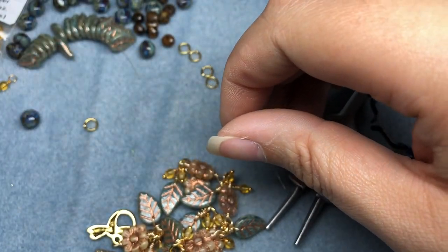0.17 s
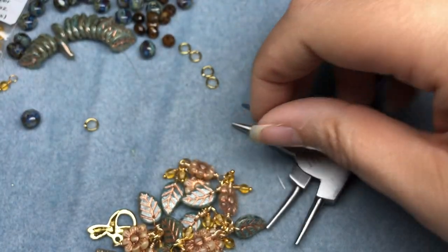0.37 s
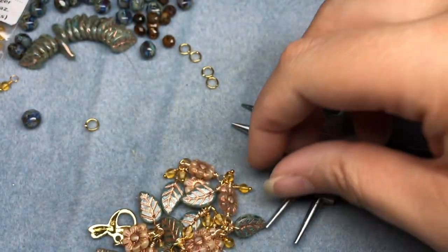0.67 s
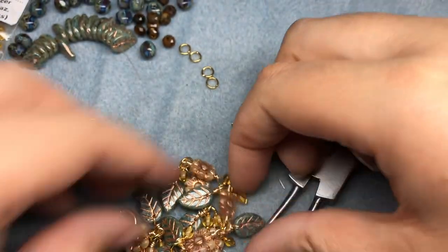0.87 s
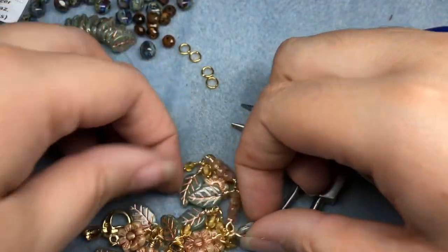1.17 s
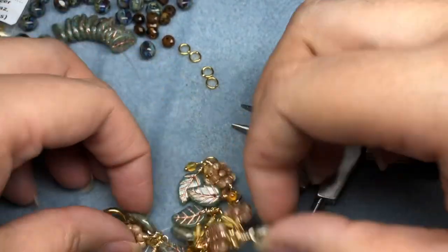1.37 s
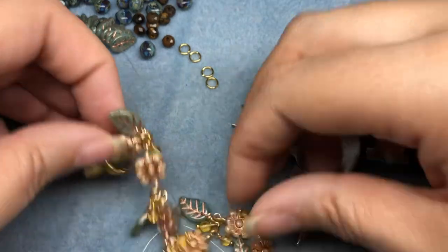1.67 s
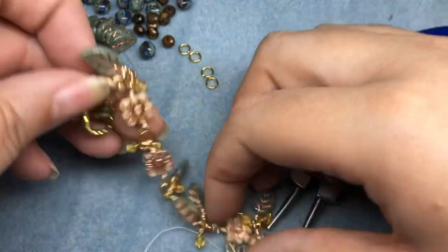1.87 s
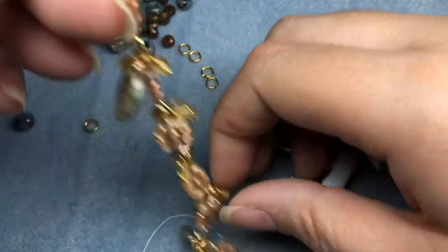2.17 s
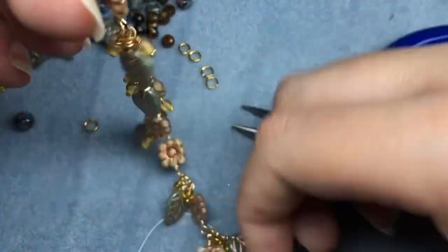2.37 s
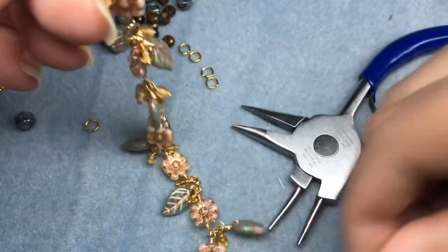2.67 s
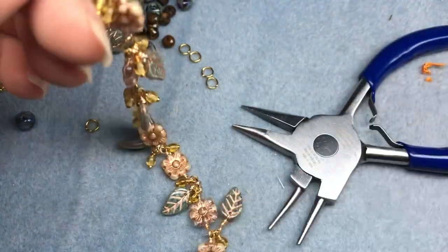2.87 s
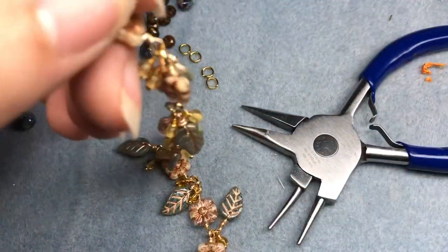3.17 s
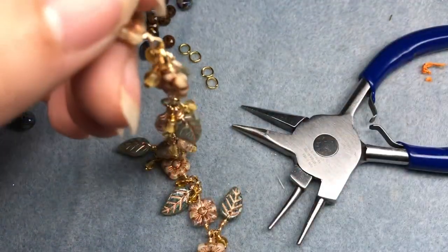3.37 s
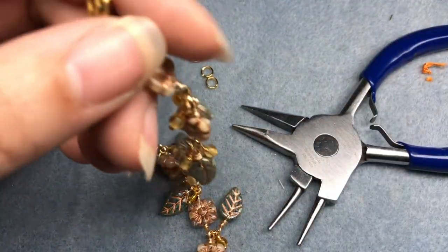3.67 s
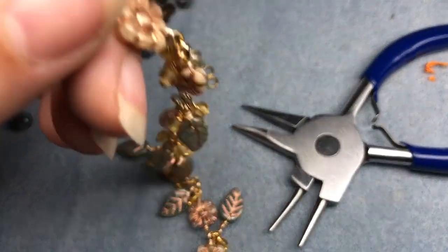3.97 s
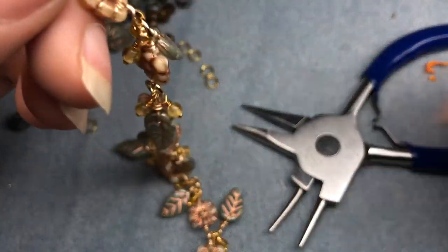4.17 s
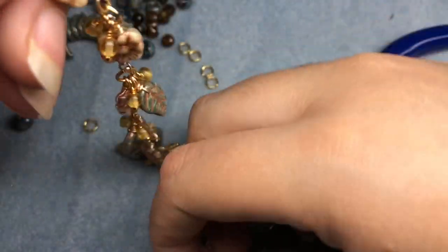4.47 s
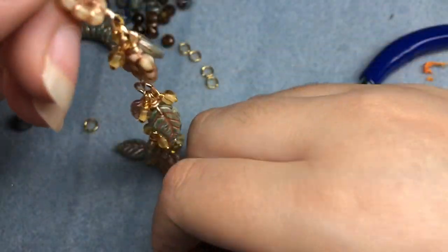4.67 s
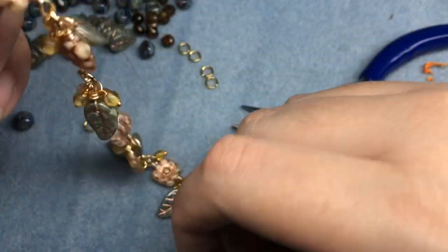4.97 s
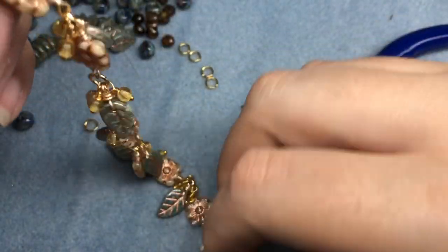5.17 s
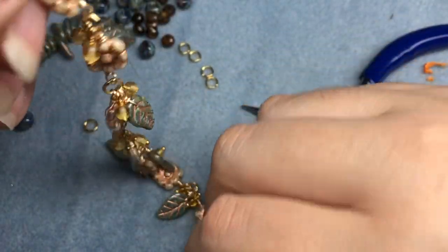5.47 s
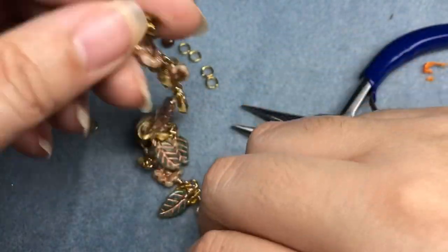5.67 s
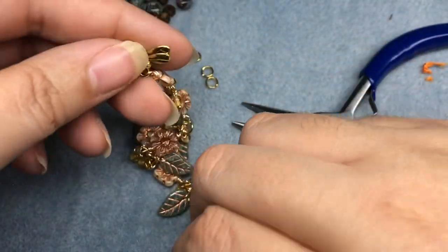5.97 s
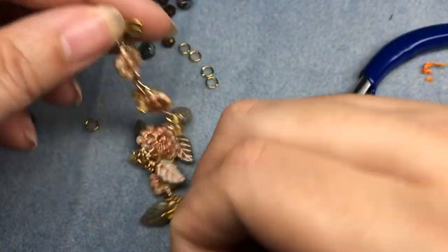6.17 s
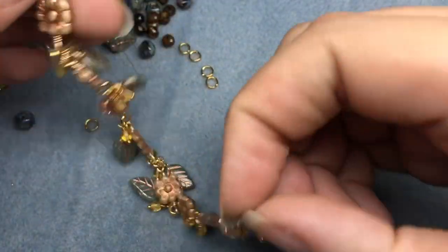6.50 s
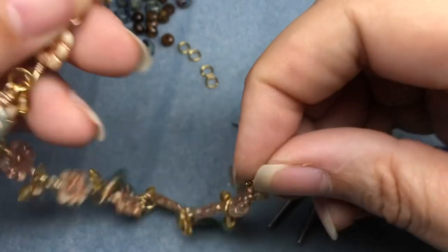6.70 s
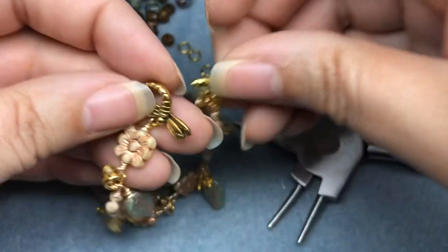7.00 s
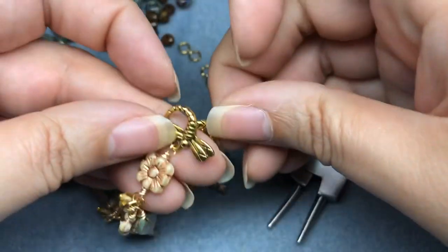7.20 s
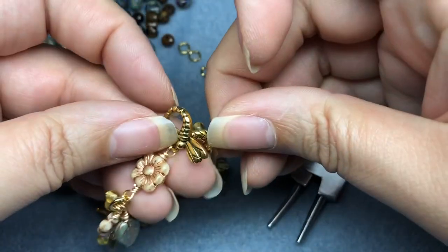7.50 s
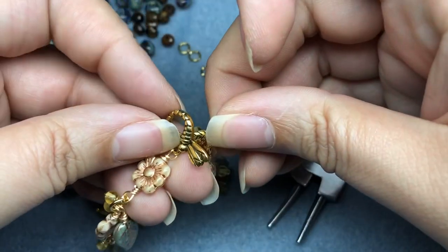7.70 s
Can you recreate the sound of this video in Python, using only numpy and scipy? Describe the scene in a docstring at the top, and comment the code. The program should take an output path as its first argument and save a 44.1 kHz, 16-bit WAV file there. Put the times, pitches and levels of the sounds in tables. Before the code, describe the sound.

After two knocks of pliers pushed aside, a beaded bracelet ticks and rattles lightly, close by in a quiet room.

```python
"""Handling a bead bracelet

In a quiet room, pliers are pushed aside: they scrape and knock twice, making a wooden table ring.
Then a bracelet is lifted and turned over a cloth mat, close to the microphone. Its glass beads, metal
leaves and rings tick against each other, and countless tiny contacts blur into a rustle.
Behind it are a faint hiss, a ventilation hum and slow sways of air pressure on the microphone."""
import sys
import numpy as np
from scipy import signal
from scipy.fft import rfft, irfft, next_fast_len
from scipy.io import wavfile
from scipy.ndimage import map_coordinates

SR = 44100
rng = np.random.default_rng(int(sys.argv[2]) if len(sys.argv) > 2 else 0)


def int16_out(signal):
    """Quantize to a 16-bit WAV file."""
    q = np.round(np.clip(np.atleast_2d(signal).T, -1, 1) * 32767)
    wavfile.write(sys.argv[1], SR, q.astype(np.int16))


N = 345744

# A fade time (fade_s) is how long a sound takes to drop by 60 dB.
# Tone of the background noise: pitch_hz, level_db
HISS_TONE = [(15, -58.5), (45, 5.5), (75, 3), (120, 1.5), (190, -6.5), (330, -12), (430, -16.5), (475, -13),
             (530, -18.5), (1300, -21), (2500, -26.5), (5000, -33), (10000, -40), (16000, -45.5)]
# Loudness of the background noise, which swells briefly around the pliers' knocks: time_s, level_db
HISS_LEVELS = [(0.0, -53), (0.45, -44.5), (0.72, -54), (4.2, -53.5), (4.45, -54.5), (7.84, -55)]
# Faint, unsteady hums of the ventilation: pitch_hz, width_hz, level_db
HUMS = [(406, 12, -80.5), (466, 14, -80), (1270, 25, -84)]
# Tone of the slow pressure sway: pitch_hz, level_db
SWAY_TONE = [(1, -20.5), (4, 2.5), (12, -4.5), (22, -14.5), (40, -45.5), (200, -140)]
# Tone of the deep rumble: pitch_hz, level_db
RUMBLE_TONE = [(5, -59.5), (12, -24), (22, 5.5), (35, -16), (55, -32), (200, -120)]
# Strength of the sway and the rumble: time_s, sway_db, rumble_db
PRESSURE_LEVELS = [(0.0, -35, -20), (0.17, -34, -56), (0.57, -31.5, -33), (1.07, -41.5, -41),
                   (1.75, -35, -45), (3.38, -38, -46), (3.67, -28.5, -40.5), (3.86, -33.5, -49.5),
                   (4.87, -34, -43), (5.46, -34, -44.5), (5.57, -41, -38), (6.03, -38, -47),
                   (6.09, -28, -44), (7.27, -40.5, -50), (7.49, -29, -34), (7.84, -48, -45)]
# Loudness of the sliding pliers: time_s, level_db
SCRAPE_LEVELS = [(0.06, -100), (0.12, -75), (0.23, -69.5), (0.24, -87), (0.39, -92), (0.41, -58),
                 (0.425, -49), (0.438, -46), (0.44, -95)]
# Pitches that stand out in the scrape: pitch_hz, width_hz, gain_db
SCRAPE_PEAKS = [(900, 1000, 3.5), (1750, 330, 4), (2737, 230, 6.5)]
# The clearest bead and leaf contacts: start_s, level_db, brightness_db_per_octave, middle_boost_db
CLEAR_TICKS = [(0.1681, -60.0, 2, 3.5), (0.8401, -65, -0.5, -3.5), (0.9493, -58.5, -4, -3.5),
               (1.0501, -55.5, -2.3, 8), (1.1743, -55.5, 1.0, 10.0), (1.2342, -55.5, 0.5, 0.0),
               (1.2437, -57, 5, 3), (1.2951, -58.5, -11, 4), (1.3305, -55.0, 2, -2.5),
               (1.338, -58, -1.5, 4.5), (1.3604, -57, 6, -0.5), (1.4298, -66, 0, 0.0),
               (1.4437, -43.5, 1.7, -5), (1.4662, -56, -4.5, 2.5), (1.4771, -62, 3, 2),
               (1.4891, -53, -2.5, 0.0), (1.5141, -50.5, 0, 1.0), (1.548, -52, 0.7, 11),
               (1.5694, -49.5, 8, 3), (1.6073, -48, -2, 11), (1.6577, -61.5, 4, 4),
               (1.7006, -61.5, -1, -5.5), (1.7635, -67.5, -3, 3), (1.8139, -57, -1.1, -4),
               (1.8927, -54.5, -0.4, 7.0), (1.9176, -58, 2, -4.5), (1.9261, -50, -11, 12.0),
               (1.9421, -46.5, 0.9, 4.5), (1.9551, -57.0, -1, 4.0), (1.971, -52, 3, 6),
               (1.98, -43, 1, 21.5), (1.9865, -47.5, 1, 9.5), (2.0553, -62, 4.0, 1),
               (2.0708, -58.5, 7.5, -4.5), (2.1197, -59.5, 4, 2.0), (2.1481, -45.5, 5.5, 3.5),
               (2.219, -54, 9, 3.5), (2.2748, -64, 0.7, 2.5), (2.3212, -62.5, 0.9, -1.0),
               (2.3332, -56, 3, 7), (2.3881, -69, -2.5, 3), (2.4434, -63, -9, 3), (2.5667, -67, 2, 1.5),
               (2.6744, -45, -3.5, 10), (2.6964, -64.5, 3, -1), (2.7787, -66.5, -8.5, 9.5),
               (2.9009, -55.5, 3.7, -3.5), (2.9673, -73, 0.5, -6), (3.6238, -67.5, -10.1, 8.5),
               (3.733, -55, -6, 5.0), (3.75, -55, -13, 6.0), (3.8273, -64.5, -6, 4), (3.981, -61.5, -7, 5),
               (3.9999, -69, 2, -3), (4.0857, -65, -1, -3), (4.4464, -65.5, -2.5, 3), (4.6544, -59, 0, 4.5),
               (4.6719, -61.0, 7, 11), (4.6814, -62, 1, 7), (4.7552, -61.5, 0.0, 10.0),
               (4.7687, -52.0, -1, 3), (4.7886, -63, 0, 13.5), (4.8405, -64.5, -6.5, 6.5),
               (4.856, -64.5, -2.5, 0.0), (4.9383, -53.5, 3.5, 2.5), (4.9787, -60.0, 3.3, -5.5),
               (5.0106, -64.5, -2.5, 1), (5.0595, -66, 0.1, -7.0), (5.1663, -70.5, 2.8, -2.5),
               (5.3109, -61.5, 1.5, 4.5), (5.494, -66, -3.5, -0.5), (5.5314, -57.5, -0.5, 10.5),
               (5.5728, -63, -0.0, 1.5), (5.6093, -55.0, 1.0, -2), (5.6222, -59.5, 6.5, 0.5),
               (5.6397, -59, 8.5, -4), (5.6666, -51.0, 5.2, -7.5), (5.6756, -63, 7.5, 2.0),
               (5.702, -54.5, 0, -5.5), (5.7514, -61.0, -1, 0.5), (5.9016, -63, -8, 8.0),
               (5.9754, -63.5, -7.5, 7.0), (6.0238, -62.5, -0.8, 2.5), (6.0966, -61, -7.5, -5),
               (6.161, -62, 0.7, -5), (6.1695, -62.0, -5.0, 2), (6.2079, -61.5, 0, 2.0),
               (6.2418, -61, 0, -4), (6.2508, -60.5, -4, 6.5), (6.2722, -56.0, 5.1, -5),
               (6.2807, -62, 5, 0.0), (6.3057, -49, 3, 8), (6.3326, -64, 3.5, -4), (6.3635, -57, 4, 3.5),
               (6.4109, -64, 2.0, 0.0), (6.4468, -64.5, 1.6, 6), (6.4548, -65, 2.8, 4),
               (6.4917, -50.5, 4, 0), (6.5182, -59.5, -2.3, -1), (6.5262, -59.0, 7.5, -3),
               (6.5337, -65, 6, 6), (6.5511, -67, 4.5, 0), (6.6289, -56, 8.2, -4.5),
               (6.6394, -55.0, 9.5, -1.5), (6.6519, -59.0, 1, 4.0), (6.6678, -57.5, 3.2, -4),
               (6.6858, -58, -1, -3.5), (6.7312, -64.5, 3, -9), (6.7661, -55.5, 3, -3.5),
               (6.7906, -51, 9.5, 5.0), (6.7995, -59.0, 2.5, -5), (6.8305, -62.5, 4, 4),
               (6.9113, -59.5, 2, -4.5), (6.9322, -49, 2.0, -5.0), (6.9392, -54, 3.5, -6),
               (6.9567, -63.0, 6, -1), (6.9702, -62.5, 4, 1.5), (7.0395, -55.5, -3.5, -1.5),
               (7.047, -60.5, 0, -2.5), (7.1692, -62, 6.5, 1.0), (7.2081, -60, 3, 0.5),
               (7.2186, -66, 3.7, 0), (7.3054, -65.5, 5, 6), (7.5289, -70, 1, -4.5),
               (7.7678, -64.0, 2.2, 2)]
# The dull, middle and bright bands of a tick: low_hz, high_hz
TICK_BANDS = [(1500, 4500), (4500, 9000), (9000, 16500)]
# The treble of a tick dies first; one value for each band: fade_ratio
TICK_FADE_RATIOS = [1.4, 1, .7]
# Pliers hitting the table: start_s, strength_db, crack_db, board_fade_s, hardness_db_per_octave
PLIER_HITS = [(0.235, -9.5, -32.5, 0.09, -7.5), (0.244, -17.5, -21, 0.037, -2.5),
              (0.249, -17.5, -28.5, 0.023, 0.5), (0.277, -24, -25, 0.054, 0.8),
              (0.288, -22, -17.5, 0.045, -0.95), (0.303, -28, -32, 0.049, -4), (0.439, -8, -21.5, 0.14, 3),
              (0.445, -14, -18, 0.056, 3.5), (0.457, -17, -17, 0.097, 0), (0.470, -1, -16.5, 0.1, 3)]
# Notes at which the table and pliers ring: pitch_hz, level_db, fade_s
TABLE_NOTES = [(487, -9, .07), (680.8, 3, .055), (896, -7.5, .08), (1235, -9, 0.12), (1383, -7, 0.045),
               (1718, -7, 0.056), (1803, -13.5, .07), (2370, -11, 0.03), (2484, -12.5, 0.055),
               (2974, -5, .022), (3357, -3, 0.02), (4302, -11, 0.022), (6200, -26.5, .035)]
# Tone of the wooden board's dense ringing: pitch_hz, level_db
BOARD_TONE = [(60, -21), (300, -19), (600, -5.5), (1400, -5.5), (2200, -9.5), (3300, -19.5), (4000, -18),
              (11000, -41), (16000, -56)]
# Tone of the table shaking on its legs: pitch_hz, level_db
SHUDDER_TONE = [(60, -7), (125, 0), (200, -8), (400, -30), (2000, -90)]
# Small metal parts left free to ring: start_s, pitch_hz, level_db, fade_s
CHARM_NOTES = [(0.288, 7630, -50, 0.12), (0.289, 5280, -36, 0.021), (0.47, 14200, -46, .06),
               (1.175, 6370, -57, 0.044), (1.608, 8350, -56.5, 0.13), (1.98, 6200, -53.5, 0.042),
               (2.442, 3300, -54, .012), (2.445, 4380, -54.5, 0.013), (0.645, 566, -43.5, 0.036),
               (2.675, 8300, -56, 0.17), (2.675, 6560, -61, 0.092), (2.675, 6100, -54, .04),
               (3.734, 2970, -47, 0.023), (3.734, 544, -49, 0.055), (4.769, 10200, -53.5, 0.045),
               (5.64, 13900, -54.5, .05), (6.306, 6500, -50, .03)]
# Background rustle, as the chain never hangs quite still: time_s, level_db
RESTING_LEVELS = [(.72, -80), (1.1, -73), (2.3, -72.5), (2.6, -78), (4.5, -80), (4.9, -77.5), (5.2, -79.5),
                  (6.0, -75.5), (7.0, -73.5), (7.4, -82), (7.84, -82)]
# Shakes of the chain: peak_s, level_db, length_s, links_over_drag_db
CHAIN_SHAKES = [(0.968, -58.5, .12, -3), (1.14, -61, .12, -8.5), (1.25, -55.5, .06, 0),
                (1.338, -53, .07, -4.5), (1.449, -53, .04, 0), (1.5, -59, .08, 3), (1.565, -51, .09, 5),
                (1.608, -68, .04, 1), (1.698, -75, 0.029, 2), (1.832, -62, .04, -3.5),
                (1.897, -55.5, .08, 2), (1.945, -52, .05, 1), (1.979, -53, .07, 5), (2.07, -60.5, .1, 4),
                (2.152, -57, .05, 7), (2.22, -68, .04, 5), (2.272, -68.5, 0.037, 4.5),
                (2.327, -65, 0.053, 5), (2.38, -67.5, 0.055, 7), (2.691, -64, .04, 2.5),
                (3.42, -70, .15, -5), (3.758, -61.5, .06, -12), (3.82, -69, .12, -7), (3.995, -72, .15, -1),
                (4.67, -59, .08, -4), (4.775, -57.5, 0.0493, -0.5), (4.856, -65.5, .04, -1),
                (4.949, -64.5, .16, 2.5),  (5.315, -65, .05, -4.5), (5.395, -68.5, 0.037, -7.5),
                (5.5, -66.5, .04, -4), (5.53, -62, .07, -7.5), (5.64, -59.5, .1, 4.5),
                (5.738, -60.5, .12, 4), (5.86, -68, .08, -2), (5.971, -68, .1, -7.5),
                (6.166, -66.5, .12, -3.5), (6.301, -60, .12, 3.5), (6.37, -63, .04, 7.5),
                (6.452, -71, .05, 7.5), (6.531, -66, .06, 12), (6.602, -64, .04, 4), (6.64, -61.5, .08, 14),
                (6.74, -64, .03, 5.5), (6.791, -60, .07, 4.5), (6.91, -65, .04, 4), (6.961, -63, .07, 14),
                (7.04, -63, .05, -2.5), (7.222, -66.5, .07, 2), (7.31, -72, .05, 5.5),
                (7.775, -72, .05, 3.5)]
# Tone of the rustling links: pitch_hz, level_db
LINK_TONE = [(1000, -90), (5000, -30.5), (8000, -11), (10000, -0.5), (14000, 2), (16500, 2)]
# Tone of the rustling beads: pitch_hz, level_db
BEAD_TONE = [(800, -89), (2500, -13), (5000, -3), (6500, -1.5), (8500, -4), (16000, -34)]
# Tone of the chain dragging over cloth: pitch_hz, level_db
DRAG_TONE = [(200, -90), (900, -24), (2000, -4.5), (3500, 2.5), (5000, -2), (10000, -40), (16000, -47.5)]
# Beads dropping on the mat: start_s, level_db
BEAD_DROPS = [(1.446, -55), (2.012, -56), (3.623, -56), (3.733, -61), (7.04, -57.5)]
# How long the room echoes: pitch_hz, fade_s
ROOM_FADES = [(100, 0.9), (700, 0.27), (2000, 0.34), (5000, 0.27), (13000, 0.21)]


def amp(db):
    """Turns decibels into a factor to multiply by."""
    return 10 ** (np.asarray(db) / 20)


def unit(x):
    """Scales a sound to an average power of 1."""
    return x / np.sqrt(np.mean(x ** 2) + 1e-20)


def along(points, hz):
    """Reads between (pitch, value) points on a log scale of pitch."""
    pitches, values = np.transpose(points)
    return np.interp(np.log(hz + 1), np.log(pitches + 1), values)


def curves(rows):
    """Joins timed rows into one dB curve per column, very quiet before the first row."""
    times, *columns = np.transpose(rows)
    return [np.interp(np.arange(N) / SR, times, column, left=-120) for column in columns]


def filtered(x, response):
    """Multiplies each frequency in x by response(hz)."""
    size = next_fast_len(N + SR // 2)
    return irfft(rfft(x, size) * response(np.fft.rfftfreq(size, 1 / SR)), size)[..., :N]


def coloured(x, tone):
    """Shapes x with a tone table, at power 1."""
    return unit(filtered(x, lambda hz: amp(along(tone, hz))))


def noise(tone):
    """Steady noise shaped by a tone table."""
    return coloured(rng.standard_normal(N), tone)


def band(low_hz, high_hz):
    """Steady noise between two pitches, at power 1."""
    sos = signal.butter(2, [low_hz, min(high_hz, SR / 2.1)], "bandpass", fs=SR, output="sos")
    return unit(signal.sosfilt(sos, rng.standard_normal(N)))


def wobble(rate):
    """A smooth curve through `rate` random points a second."""
    return map_coordinates(rng.standard_normal(int(N * rate / SR) + 4), [np.arange(N) * rate / SR])


def add(x, start_s, piece):
    """Mixes a piece into x at start_s."""
    part = x[round(start_s * SR):][:len(piece)]
    part += piece[:len(part)]


def cut(x, start_s, samples):
    """Takes a short piece of x from start_s."""
    return x[..., round(start_s * SR):][..., :samples]


def air():
    """Background noise and ventilation hum, over slow sways of pressure and a deep rumble."""
    (hiss_db,), (sway_db, rumble_db) = curves(HISS_LEVELS), curves(PRESSURE_LEVELS)
    hiss = amp(hiss_db) * noise(HISS_TONE)
    hum = sum(amp(db) * band(hz - width / 2, hz + width / 2) for hz, width, db in HUMS)
    return hiss + hum + amp(sway_db) * noise(SWAY_TONE) + amp(rumble_db) * noise(RUMBLE_TONE)


def pliers_scrape():
    """Sliding pliers make an uneven noise with a few strong pitches."""
    def peaks(f):
        response = sum(amp(db) * 1j * f * width / (hz * hz - f * f + 1j * f * width)
                       for hz, width, db in SCRAPE_PEAKS)
        return response ** 2  # squaring steepens the sides of each peak

    (level_db,) = curves(SCRAPE_LEVELS)
    return amp(level_db + 2 * wobble(99)) * unit(filtered(rng.standard_normal(N), peaks))


def stray_ticks(rustle_db, bright_db, count, below_db=6.5, size_spread_db=3, tone_spread_db=2.5):
    """Rows like CLEAR_TICKS for faint contacts at chance moments, as strong as the chain moves."""
    at = rng.integers(0, N, count)
    size, tilt, middle = rng.standard_normal((count, 3)).T
    level_db = rustle_db[at] - below_db + size_spread_db * size
    tilt_db = bright_db[at] / 2 + tone_spread_db * tilt
    return np.transpose([at / SR, level_db, tilt_db, tone_spread_db * middle])


def bead_ticks(rustle_db, bright_db, typical_fade_s=.0069, rise_s=.0001):
    """Hard little contacts: a burst of noise and a few notes that differ from bead to bead."""
    out, t = np.zeros(N), np.arange(SR // 60) / SR
    grit = np.pad([band(*edges) for edges in TICK_BANDS], ((0, 0), (0, len(t))), "wrap")
    low_hz, high_hz = np.transpose(TICK_BANDS)[:, :, None]
    octaves = np.log2(low_hz * high_hz)[:, 0] / 2  # centre of each band
    rows = np.vstack([CLEAR_TICKS, stray_ticks(rustle_db, bright_db, count=300)])
    for start_s, db, tilt_db, middle_db in rows:
        place, phase = rng.random((2, 3, 2))  # two notes in each of the three bands
        pitch_hz = low_hz * (high_hz / low_hz) ** place
        notes = np.sin(2 * np.pi * (pitch_hz[..., None] * t + phase[..., None])).sum(axis=1)
        stretch = np.exp(.35 * rng.standard_normal() - .025 * (db + 54.5))  # stronger ticks die sooner
        fade_s = typical_fade_s * stretch * np.c_[TICK_FADE_RATIOS]
        shape = amp(-60 * t / fade_s) * (1 - np.exp(-t / rise_s))
        bands = shape * (.55 * notes + .83 * cut(grit, start_s, len(t)))
        shares = amp(tilt_db * octaves + [0, middle_db, 0])
        tick = (shares / np.linalg.norm(bands, axis=1)) @ bands / np.linalg.norm(shares)
        add(out, start_s, amp(db) * np.sqrt(SR / 200) * tick)  # as much energy as 5 ms at this level
    return out


def pliers_knocks(rise_s=.00024, crack_fade_s=.02):
    """Each hit rings the table's notes at new strengths, over a wooden thud and a steel crack."""
    out, t = np.zeros(N), np.arange(SR // 3) / SR
    board, steel = noise(BOARD_TONE), band(3600, 11000)
    hz, note_db, fade_s = np.transpose(TABLE_NOTES)
    fade_s = np.minimum(fade_s, .08)  # no table note rings longer than 0.08 s
    for start_s, db, crack_db, board_fade_s, hardness in PLIER_HITS:
        chance_db, detune = rng.standard_normal((2, len(hz)))
        strength_db = note_db + hardness * np.log2(hz / 1000) + chance_db  # harder hits are brighter
        pitch_hz = hz * (1 + .008 * detune)  # the grip shifts the notes a little
        fades = amp(strength_db[:, None] - 60 * t / fade_s[:, None])
        ring = amp(-11) * (fades * np.sin(2 * np.pi * np.outer(pitch_hz, t))).sum(axis=0)
        thud = amp(-12 - 60 * t / board_fade_s) * cut(board, start_s, len(t))
        crack = amp(crack_db - 4.5 - 60 * t / crack_fade_s) * cut(steel, start_s, len(t))
        add(out, start_s, amp(db) * (1 - np.exp(-t / rise_s)) * (ring + thud + crack))
    return out


def table_shudder(below_hit_db=34.5, rise_s=.004, fade_s=.23):
    """Each hit of the pliers shakes the whole table on its legs, deep in the bass."""
    out, t = np.zeros(N), np.arange(SR // 2) / SR
    legs = noise(SHUDDER_TONE)
    shape = amp(-60 * t / fade_s) * (1 - np.exp(-t / rise_s))
    for start_s, db, *_ in PLIER_HITS:
        add(out, start_s, amp(db - below_hit_db) * shape * cut(legs, start_s, len(t)))
    return out


def charm_chimes(flutter_db=4.8):
    """Loose rings and charms sound single notes, which flutter as they swing."""
    out, t = np.zeros(N), np.arange(SR // 3) / SR
    for start_s, hz, db, fade_s in CHARM_NOTES:
        add(out, start_s, amp(db - 60 * t / fade_s) * np.sin(2 * np.pi * hz * t))
    return out * amp(flutter_db * wobble(120))


def chain_motion(rise_share=.49, edge_drop_db=11):
    """The rustle's level and brightness in dB: each shake swells to a peak and dies away."""
    t = np.arange(N) / SR
    (rest_db,) = curves(RESTING_LEVELS)
    power, weighted_brightness = amp(rest_db) ** 2, np.zeros(N)
    for peak_s, db, length_s, bright_db in CHAIN_SHAKES:
        near = slice(max(round((peak_s - 2 * length_s) * SR), 0), round((peak_s + 2 * length_s) * SR))
        offset = (t[near] - peak_s) / length_s
        away = np.maximum(-offset / rise_share, offset / (1 - rise_share))  # 0 at the peak, 1 at an edge
        swell = amp(db - edge_drop_db * away) ** 2
        power[near] += swell
        weighted_brightness[near] += swell * bright_db
    return 10 * np.log10(power), weighted_brightness / power


def grains(per_second, spread_db, fade_s, clump):
    """Tiny contacts: puffs of noise that come in clumps and in very unequal sizes."""
    hits = rng.random(N) < per_second / SR * np.exp(clump * wobble(35))
    sizes = hits * amp(spread_db * np.minimum(rng.exponential(size=N), 4))
    loudness = signal.lfilter([1], [1, -amp(-60 / (fade_s * SR))], sizes)  # each hit fades away
    return loudness * rng.standard_normal(N)


def chain_rustle(rustle_db, bright_db):
    """Countless links and beads touch faintly while the chain drags over the cloth."""
    links = coloured(grains(1200, spread_db=2.5, fade_s=.005, clump=.25), LINK_TONE)
    beads = coloured(grains(1200, spread_db=2.5, fade_s=.007, clump=.25), BEAD_TONE)
    drag = coloured(grains(2000, spread_db=2, fade_s=.01, clump=.15), DRAG_TONE)
    mix = amp(-4.5 + bright_db / 2) * links + amp(-5) * beads + amp(-7 - bright_db / 2) * drag
    return amp(rustle_db) * mix


def bead_drops(fade_s=.044):
    """Dropped beads sound the board softly through the cloth."""
    out, t = np.zeros(N), np.arange(SR // 2) / SR
    board = noise(BOARD_TONE)
    for start_s, db in BEAD_DROPS:
        add(out, start_s, amp(db - 60 * t / fade_s) * cut(board, start_s, len(t)))
    return out


def room_echo(x, delay_samples=200):
    """The room answers a moment later, each pitch dying at its own speed."""
    hz, t, spectrum = signal.stft(rng.standard_normal(SR // 2), SR, nperseg=256)
    fades = amp(-60 * t / along(ROOM_FADES, hz)[:, None])
    _, tail = signal.istft(spectrum * fades, SR, nperseg=256)
    return signal.fftconvolve(np.pad(x, (delay_samples, 0)), tail / np.linalg.norm(tail))[:N]


def scene():
    """Mixes everything into one channel; only the pliers, ticks and chimes echo."""
    rustle_db, bright_db = chain_motion()
    pliers = pliers_knocks() + pliers_scrape()
    beads = bead_ticks(rustle_db, bright_db) + charm_chimes()
    echo = room_echo(amp(-11) * pliers + amp(-16.5) * beads)
    table = table_shudder() + bead_drops()
    return (pliers + beads + echo + table + chain_rustle(rustle_db, bright_db) + air())[None]


def record(dry, droop_hz=15850, droop_db=-22, top_hz=16520):
    """Turns down the highest treble and keeps nothing above top_hz."""
    return filtered(dry, lambda hz: np.where(hz > droop_hz, amp(droop_db), 1) * (hz < top_hz))


dry = scene()
out = record(dry)
int16_out(out)
```